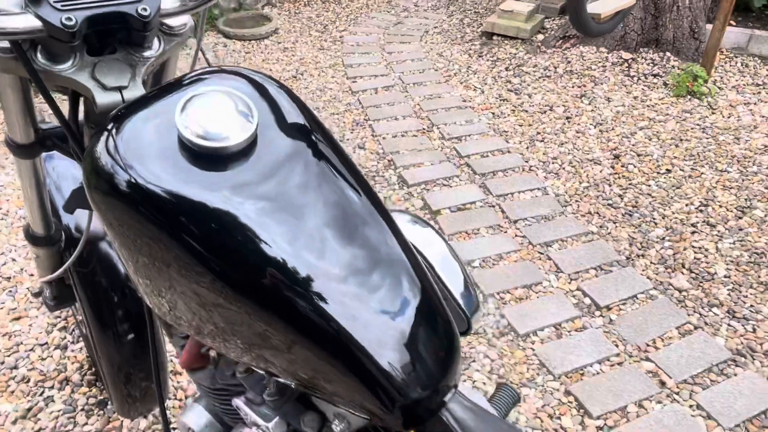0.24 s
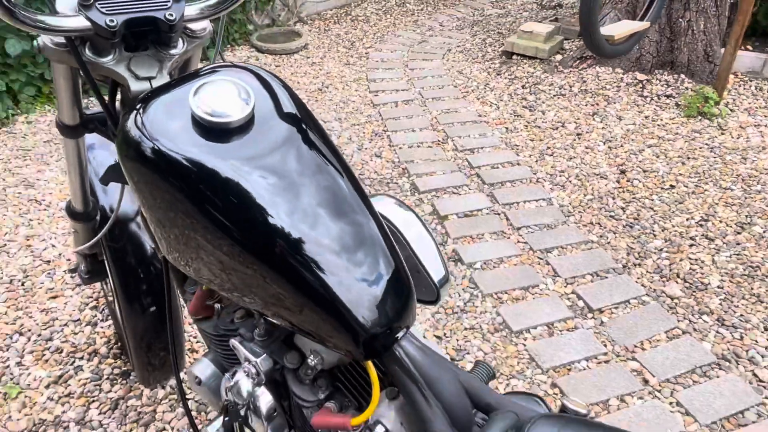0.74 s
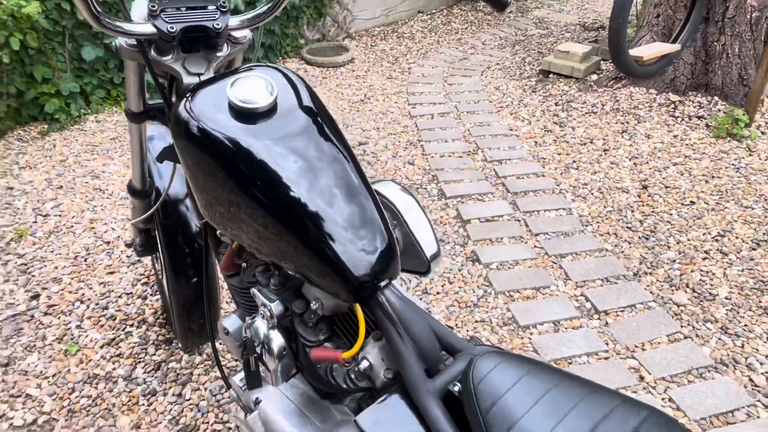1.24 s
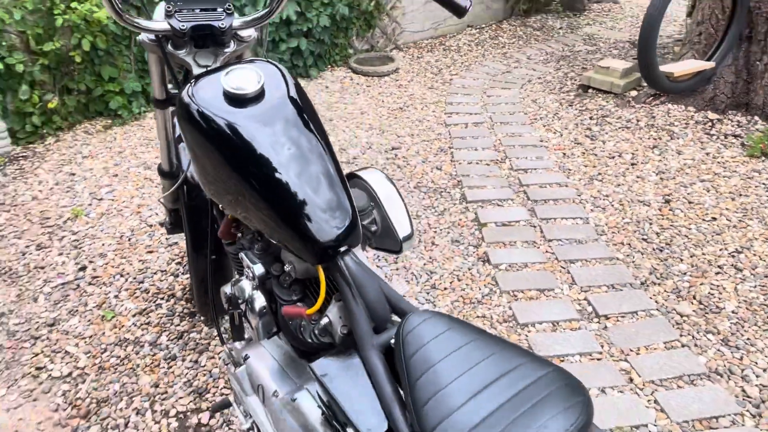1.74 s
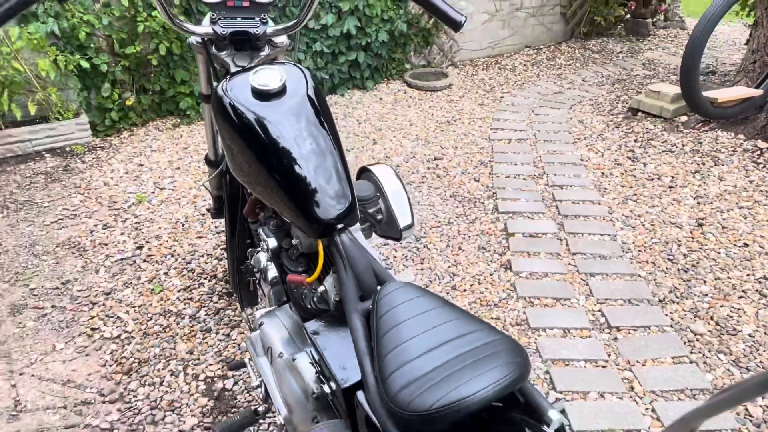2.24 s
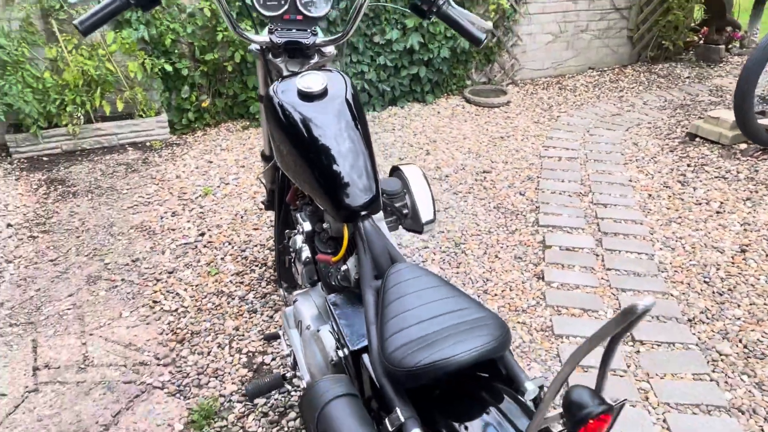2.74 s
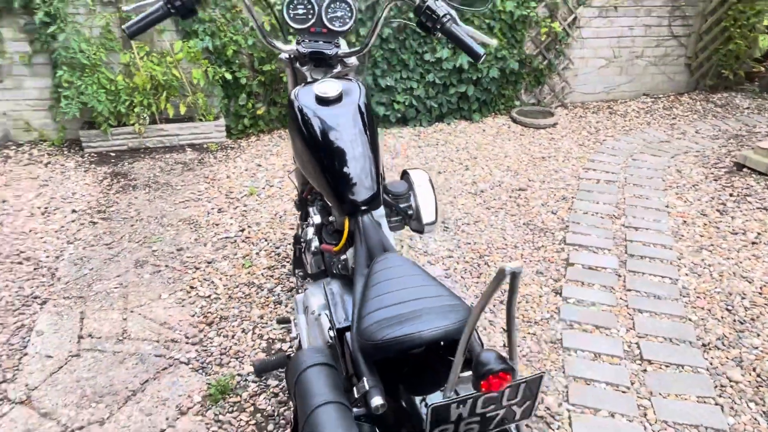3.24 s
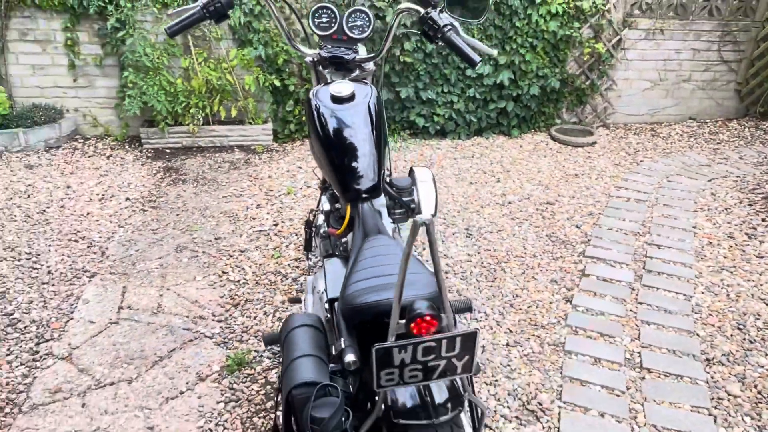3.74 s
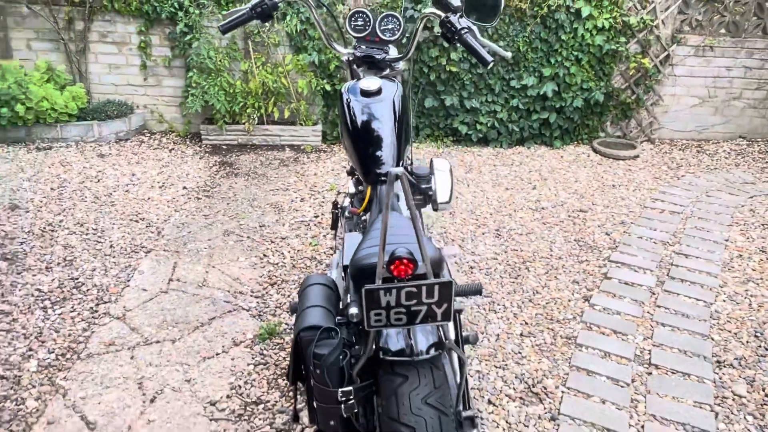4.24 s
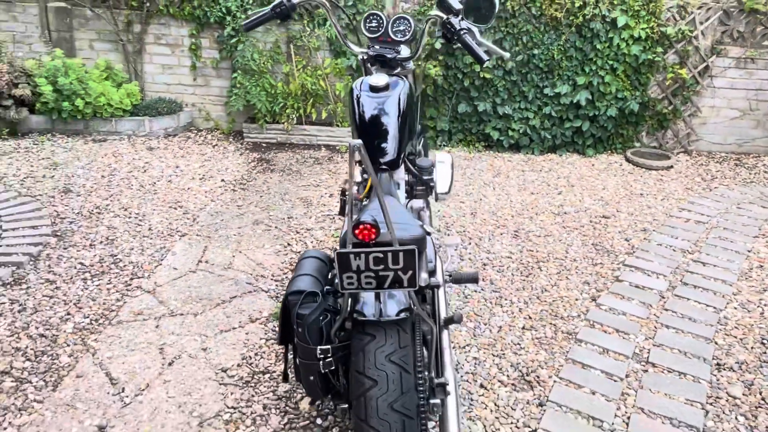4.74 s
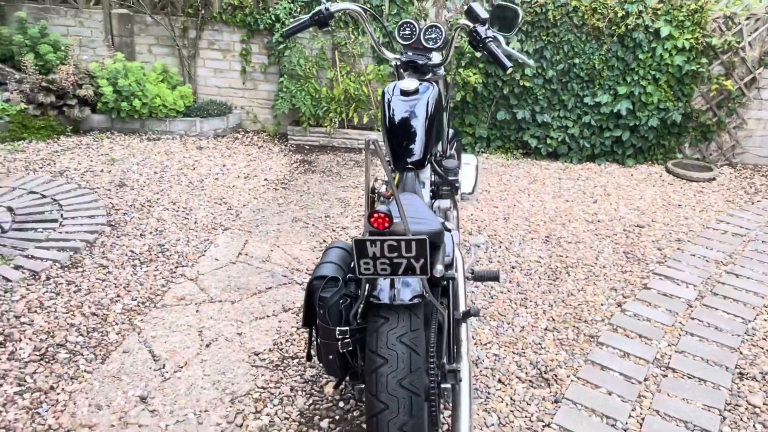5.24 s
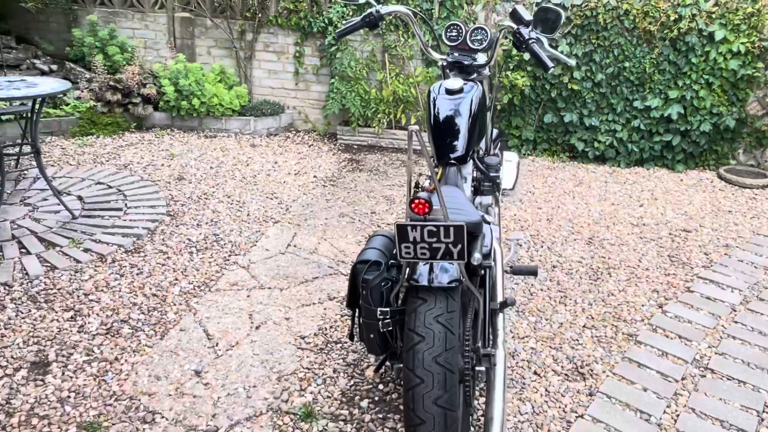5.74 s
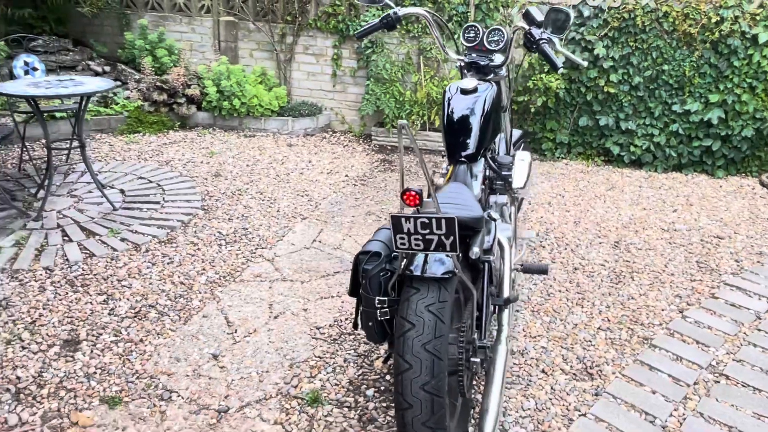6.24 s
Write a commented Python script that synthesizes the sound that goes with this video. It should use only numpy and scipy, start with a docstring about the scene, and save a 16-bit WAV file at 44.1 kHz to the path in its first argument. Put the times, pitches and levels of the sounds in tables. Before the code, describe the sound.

Close stereo pickup of a big two-cylinder motorcycle at a steady but lumpy idle in an open yard. Rapid low thuds alternate strong and weak over a continuous mechanical rattle. Near the engine there are ticks, clanks and dull knocks; from the midpoint the microphone reaches the pipes, and dry cracks, clacks and airy spitting stand out over the thumps. It continues running to the end, without revving.

```python
"""A two-cylinder motorcycle idles unevenly while the listener walks from the tank to the tail pipes.
Each firing is a knock in the engine (filtered noise), a crack at the pipe mouth (resonant noise bursts)
and a low thump (a short pressure swing); some firings are weak or almost silent.
Valve gear and chains clatter underneath as patchy noise, with ringing cases and gear whine.
The gas in the pipes keeps ringing between firings, and a microphone pair hears it all in stereo."""
import sys
import numpy as np
from scipy import signal
from scipy.fft import rfft, irfft
from scipy.io import wavfile
from scipy.ndimage import uniform_filter1d

SR = 44100
rng = np.random.default_rng(int(sys.argv[2]) if len(sys.argv) > 2 else 0)


def to_wav(s):
    """Save 16-bit WAV."""
    ch = np.atleast_2d(s).T  # columns
    pcm = np.round(np.clip(ch, -1, 1) * 32767)  # PCM
    wavfile.write(sys.argv[1], SR, pcm.astype(np.int16))


N = 285768


def gain_of(db):
    """Decibels to gain."""
    return 10 ** (np.asarray(db) / 20)


def evened(x):
    """Scales to rms 1."""
    return x / np.sqrt(np.mean(x ** 2) + 1e-20)


def read(points, hz, axis=1):
    """One column of a table, joined on a log-frequency axis."""
    table = np.transpose(points)
    return np.interp(np.log(hz + 1), np.log(table[0] + 1), table[axis])


def along(when, values):
    """A curve over the whole scene, one value a sample."""
    return np.interp(np.arange(N) / SR, when, values)


def noise(magnitude):
    """Two unrelated noises with the given magnitude spectrum, rms 1."""
    hz = np.fft.rfftfreq(N, 1 / SR)
    return evened(irfft(rfft(rng.standard_normal((2, N))) * magnitude(hz), N))


def ringing(modes):
    """Two unrelated noises held in steep resonances, rms 1; modes are (Hz, width Hz, dB)."""
    return noise(lambda hz: sum(gain_of(db) / (1 + (2 * (hz - f) / width) ** 2) for f, width, db in modes))


def bursts(times, levels_db, rise, fall):
    """Sum of envelopes with a smooth rise to each time and an exponential fall, peak at the level."""
    at = np.round((np.asarray(times) - rise) * SR).astype(int)
    t = np.arange(-rise, 8 * fall, 1 / SR)
    inside, train = (at >= 0) & (at < N), np.zeros(N)
    np.add.at(train, at[inside], gain_of(levels_db)[inside])
    shape = np.where(t < 0, np.cos(t / rise * np.pi / 2) ** 2, np.exp(-np.maximum(t, 0) / fall))
    return signal.oaconvolve(train, shape)[:N]


def pulses(times, sizes):
    """One-sample pulses of the given sizes, with a second to spare at the end."""
    return np.bincount(np.round(SR * times).astype(int), sizes, N + SR)


def dip(t, hz, width):
    """A pressure trough at time 0: a cosine under a bell envelope."""
    return -np.cos(2 * np.pi * hz * t) * np.exp(-(t / width) ** 2 / 2)


def struck(s, hz, level_db, rise, fall):
    """Short tones of random phase, one at each time."""
    t, out = np.arange(0, .05, 1 / SR), np.zeros(N + SR)
    shape = np.where(t < rise, np.sin(t / rise * np.pi / 2) ** 2, np.exp(-(t - rise) / fall))
    for at, f, db, turn in zip(s, hz, level_db, rng.random(len(s))):
        out[round(at * SR):][:len(t)] += gain_of(db) * shape * np.sin(2 * np.pi * (f * t + turn))
    return out[:N]


# one row a firing, the two cylinders alternating: (time of the thump's trough [s], relative burn strength [dB])
FIRING_ORDER = [(0.0177, -5), (0.098, -4.5), (0.1619, -16), (0.232, -13), (0.3045, -4.5), (0.3813, -4),
                (0.442, -10), (0.508, -19), (0.58, -8), (0.6707, -5), (0.73, -3.5), (0.8055, -19),
                (0.87, -12), (0.9502, -5.5), (1.0082, -3.5), (1.08, -5.5), (1.1431, -11), (1.2136, -6),
                (1.277, -6), (1.351, -5), (1.416, -11), (1.4926, -7.5), (1.558, -4.5), (1.6389, -5.5),
                (1.715, -22), (1.773, -8.5), (1.8379, -4.5), (1.9145, -5), (1.982, -11), (2.059, -7.5),
                (2.129, -5), (2.2156, -6), (2.2796, -7.5), (2.3631, -8), (2.429, -4.5), (2.512, -5.5),
                (2.57, -17.5), (2.6554, -11.5), (2.726, -3.5), (2.8032, -4.5), (2.8671, -8.5), (2.936, -13),
                (3.012, -7), (3.1, -5), (3.1565, -5), (3.218, -13), (3.29, -8), (3.3675, -5.5), (3.428, -4),
                (3.508, -7), (3.5707, -8), (3.6561, -5), (3.7153, -4.5), (3.789, -7), (3.854, -8),
                (3.934, -26), (4.0087, -6), (4.103, -4.5), (4.16, -4.5), (4.2278, -8.5), (4.2915, -8.5),
                (4.367, -5.5), (4.4331, -24), (4.5131, -7.5), (4.5757, -4), (4.646, -6), (4.709, -8),
                (4.783, -9.5), (4.849, -31), (4.9313, -7.5), (4.996, -3.5), (5.0683, -6), (5.1284, -8.5),
                (5.196, -15), (5.272, -38), (5.3595, -6), (5.415, -2.5), (5.484, -21), (5.5455, -8),
                (5.6214, -6), (5.6815, -6.5), (5.7599, -7.5), (5.8208, -5), (5.8965, -7.5), (5.962, -9.5),
                (6.041, -9), (6.1061, -4), (6.1867, -6), (6.2536, -10.5), (6.331, -11.5), (6.401, -4),
                (6.4792, -5.5)]


def firings():
    """Time [s], burn strength [dB] and cylinder (0 first, 1 second) of each firing."""
    s, burn_db = np.transpose(FIRING_ORDER)
    return s, burn_db, np.arange(len(s)) % 2


USUAL_DB = -6  # burn strength of a usual firing


def heard(curve, slope):
    """Level of one part of each firing: the walk sets it for a usual firing, the burn strength moves it."""
    s, burn_db, second = firings()
    when, first_db, second_db = np.transpose(curve)
    usual = np.where(second, np.interp(s, when, second_db), np.interp(s, when, first_db))
    return usual + np.array(slope)[second] * (burn_db - USUAL_DB)


def valve_opens():
    """Moment each exhaust valve cracks open, earlier ahead of the thump when the firing is weak."""
    s, burn_db, _ = firings()
    return s - np.clip(.0095 - 0.00067 * (burn_db + 3), .009, .0150)


# noise colour of the moving parts: (frequency [Hz], relative level per Hz [dB])
CLATTER_COLOUR = [(90, -12), (190, -2), (280, -5), (450, -11), (900, -6.5), (1900, -5.5), (2700, -12.5),
                  (3300, -16.5), (5300, -17.5), (7000, -26), (9000, -36), (11000, -30.5), (13000, -49),
                  (15500, -36)]
# walk round the machine: (time [s], relative clatter level [dB], tilt of the clatter [dB per octave])
WALK_LEVELS = [(0.0, -24, -2.5), (0.85, -25, -2.5), (2.04, -27.5, -2.5), (3.2, -27.5, -3),
               (3.7, -27.5, -2.46), (4.06, -28.5, -2.5), (6.48, -29.5, -2.53)]
# gear train whines: (frequency [Hz], width [Hz], relative level [dB])
GEAR_WHINES = [(1183, 9.8, -24), (2494, 27, -22)]


def clatter():
    """Valve gear, chains and intake: dense noise in drifting patches; valves tick by crank angle; gears whine."""
    frames, hz = N // 128 + 5, np.fft.rfftfreq(512, 1 / SR)
    s, level_db, tilt_db = np.transpose(WALK_LEVELS)
    t = np.arange(frames) * 128 / SR
    a, b, c, d, patches, flutter = rng.standard_normal((frames, len(hz), 6)).T
    flutter = evened(uniform_filter1d(uniform_filter1d(flutter, size=40, axis=0), size=8, axis=1))
    patches = evened(uniform_filter1d(uniform_filter1d(patches, size=3, axis=0), size=6, axis=1))

    octaves = np.log2(hz[:, None] / 1200 + 0.004)
    colour_db = read(CLATTER_COLOUR, hz)[:, None] + octaves * np.interp(t, s, tilt_db)
    flutter_share = np.clip(hz[:, None] / 3000, 0, 1)  # only the treble flutters fully
    drift_db = 2.6 * patches + 2.2 * flutter * flutter_share
    z = np.array([a + 1j * b, c + 1j * d]) * gain_of(colour_db + drift_db)
    hiss = evened(signal.istft(z, nperseg=512, noverlap=384)[1][:, :N])

    fired, burn_db, _ = firings()
    draws = rng.random((len(fired) - 1, 4, 2))
    crank = np.array([.12, .35, .62, .8]) + 0.11 * draws[..., 0]  # share of the gap between firings
    ticks = fired[:-1, None] + np.diff(fired)[:, None] * crank
    rattle = 1 + bursts(ticks.ravel(), -8. + 12 * draws[..., 1].ravel(), 0.003, 0.0035)
    rattle += bursts(fired - .022, -7 + 1.2 * (burn_db - USUAL_DB), 0.014, 0.03)  # swells with each burn

    whine = sum(gain_of(db) * ringing([(f, width, 0)]) for f, width, db in GEAR_WHINES)
    whine = whine * (1 + 2 * np.exp(-np.arange(N) / SR / 0.27))  # strongest beside the engine
    return (evened(hiss * rattle) + whine) * gain_of(2.0 + along(s, level_db))


# resonances of the engine cases: (frequency [Hz], width [Hz], relative level [dB])
CASE_RESONANCES = [(647, 27, -3.5), (850, 110, -5), (1075, 42, -9), (1460, 100, -23), (1980, 84, 7),
                   (4730, 120, -15)]


def clanks():
    """Metallic clanks of the cases at scattered moments about 26 to 50 ms ahead of each thump, uneven by mode."""
    s, level_db = np.transpose(WALK_LEVELS)[:2]
    fired, burn_db, _ = firings()
    blows, out = rng.random((len(CASE_RESONANCES), len(fired), 3)), 0
    for (hz, width, db), rows in zip(CASE_RESONANCES, blows):
        at = fired - np.where(rows[:, 2] < .6, .034, .05) + .008 * rows[:, 0]
        blow_db = db + .3 * burn_db - 3.0 - 14.0 * rows[:, 1]
        out += ringing([(hz, width, 0)]) * bursts(at, blow_db, 0.002, 0.01)
    return out * gain_of(along(s, level_db))


# noise colour of the knock: (frequency [Hz], relative level per Hz [dB])
KNOCK_COLOUR = [(300, -23), (800, 26), (1900, 23.5), (2600, 30.5), (3500, 1), (5000, 15), (7000, -35),
                (15500, -109)]
# knock of a usual firing along the walk: (time [s], first cylinder [relative dB], second [relative dB])
KNOCK_WALK = [(0, -11, -9.5), (0.8, -9.5, -7.5), (2.0, -25, -22.5), (3.0, -16.5, -18), (3.6, -15, -10.5),
              (4.2, -26, -21), (4.6, -20, -28), (5.2, -7.5, -7), (5.7, -16, -13), (6.48, -25, -27)]
KNOCK_SLOPE = (0.099, 3.7)  # dB per dB of burn strength: first, second cylinder


def knocks():
    """Combustion rings the engine cases a little before the exhaust opens: a sharp tick and a duller ring."""
    s, _, second = firings()
    knock_db = heard(KNOCK_WALK, KNOCK_SLOPE)
    at = s - np.where(second, .0360, .0355)
    ring = noise(lambda hz: gain_of(read(KNOCK_COLOUR, hz))) * bursts(at, knock_db - 21.5, 0.0026, 0.011)
    tick = ringing([(4720, 3300, 0)]) * bursts(at, knock_db - 22.0, 0.0013, 0.011)
    return ring + tick


# loudest knocks in the engine cases: (time [s], relative level [dB], ring [Hz], relative tick level [dB])
CASE_BLOWS = [(0.064, -6, 817, -21), (0.265, -20, 1090, -29), (0.348, -12, 940, -28),
              (0.633, -10.5, 775, -23), (0.695, -6, 1850, -24), (0.91, -6.5, 902, -22),
              (0.974, -38, 1060, -34), (1.242, -13, 1680, -34), (1.521, -10.5, 884, -47.5),
              (1.602, -13, 840, -24.5), (1.8, -8.5, 1120, -41), (2.475, -15, 1120, -27),
              (2.687, -7.5, 1095, -42), (2.769, -12, 1430, -24.5), (3.062, -14, 1420, -30),
              (3.124, -7, 1176, -36)]


def hard_knocks():
    """The loudest knocks in the engine cases: a sudden coarse burst, a short ring and a tick."""
    s, peak_db, hz, tick_db = np.transpose(CASE_BLOWS)
    coarse = noise(lambda f: gain_of(read(KNOCK_COLOUR, f)) / (1 + (f / 2800) ** 6))
    burst = coarse * bursts(s + 0.00099, peak_db - 15.0, 0.0022, 0.0049)
    ring = struck(s, hz, peak_db - 14.5, 0.0011, 0.01)
    tick = ringing([(5100, 2700, 0)]) * bursts(s + 0.00042, tick_db - 7.0, 0.001, 0.014)
    return burst + ring + tick


# standing waves in the pipes: (frequency [Hz], width [Hz], relative level [dB])
STANDING_WAVES = [(55, 40, -44), (119, 18, -39)]
# combustion thud: lead on the thump [s], level relative to the burn [dB] for first and second cylinder
THUD_EARLY_S, THUD_DB = 0.0285, (-21, -22.5)


def pipes():
    """The gas columns keep ringing; each firing adds a low combustion thud, then a puff of turbulence."""
    s, burn_db, second = firings()
    swell = 2.74 + bursts(s + 0.0098, 1.9 * burn_db, 0.049, 0.064)
    ring = sum(gain_of(db) * ringing([(hz, width, 0)])[0] for hz, width, db in STANDING_WAVES) * swell
    puff = bursts(s - .006, burn_db - 30.5, 0.013, 0.0018)
    thud = bursts(s - THUD_EARLY_S, burn_db + np.array(THUD_DB)[second], 0.004, 0.018)
    return ring + ringing([(255, 60, 0)])[0] * (puff + thud)


# slow heave of gas, first and second pipe:
# (trough after the thump [s], frequency [Hz], bell width [s], level at 0 dB burn strength [dB])
GAS_HEAVES = [(-.0005, 67, 0.01, -24.5), (.0125, 78.5, 0.012, -17)]
# return stroke: delay after the thump [s], pitch [Hz], middle level [dB]
STROKE_S, STROKE_HZ, STROKE_DB = 0.0443, 71.5, -20.5


def heaves():
    """Low swings of gas: one with each thump, one pumped by the return stroke, burn or no burn."""
    (s, burn_db, _), t, out = firings(), np.arange(-1500, 1501) / SR, 0
    for k, (late, hz, width, db) in enumerate(GAS_HEAVES):
        train = pulses(s[k::2] + late, gain_of(0.46 * burn_db[k::2] + db))
        out += signal.oaconvolve(train, dip(t, hz, width), "same")[:N]
    draws = rng.random((len(s), 2)) - .5
    train = pulses(s + STROKE_S + 0.0095 * draws[:, 0], gain_of(STROKE_DB + 8.1 * draws[:, 1]))
    return out + signal.oaconvolve(train, dip(t, STROKE_HZ, 0.0062), "same")[:N]


POP_HZ, POP_S = 300, 0.0022  # pitch, bell width
POP_OPEN_DB, POP_TROUGH_DB = (-19, -24), (-23, -30)  # relative to the burn: first, second cylinder


def pops():
    """Short pressure dips that sharpen the start and the trough of each firing."""
    (s, burn_db, second), t = firings(), np.arange(-200, 201) / SR
    open_db = burn_db + np.array(POP_OPEN_DB)[second]
    trough_db = burn_db + np.array(POP_TROUGH_DB)[second]
    train = pulses(np.concatenate([valve_opens() - .002, s]), gain_of(np.concatenate([open_db, trough_db])))
    return signal.oaconvolve(train, dip(t, POP_HZ, POP_S), "same")[:N]


# loudest cracks, ringing the pipe mouth: (time [s], relative level [dB], low pitch [Hz], high pitch [Hz])
MOUTH_CLACKS = [(1.546, -19, 1310, 2000), (1.827, -16, 1420, 2300), (2.4174, -20, 1350, 2350),
                (3.2741, -16, 1620, 2470), (3.4155, -14, 1280, 3320), (3.7035, -14, 2180, 2560),
                (3.9952, -13.5, 1736, 2730), (4.1465, -9, 1480, 2870), (4.2747, -14.5, 1640, 2890),
                (4.5637, -5, 1740, 2880), (4.6944, -12, 1296, 2900), (4.9842, -9, 1260, 2690),
                (5.1114, -14, 1560, 2470), (5.403, -8, 1630, 2920), (5.53, -27, 1960, 2800),
                (5.6695, -20, 1600, 2690), (5.8085, -19, 1780, 2730), (5.9464, -16.5, 1650, 2880),
                (6.0935, -9.5, 1590, 2820), (6.2354, -18, 1640, 3100), (6.3866, -14, 1410, 3280)]


def clacks():
    """The pipe mouth swells into a ring at two pitches and their relatives; the higher one then chatters."""
    s, peak_db, low_hz, high_hz = np.transpose(MOUTH_CLACKS)
    partials = ((low_hz, -8.0), (high_hz, -8.0), (.93 * high_hz, -11.0),
                (0.599 * low_hz, -14.0), (1.7 * high_hz, -19.0))
    out = 0
    for hz, db in partials:
        out += struck(s - .0025, hz, peak_db + db, .0045, .0026)
    for late in (.018, .023, .04):
        out += struck(s + late, high_hz, peak_db - 23.0, .002, .0025)
    return out


# hiss of the gas jet: (frequency [Hz], relative level per Hz [dB])
JET_HISS = [(6500, -16), (7500, 3), (9000, 1.5), (11000, 1), (13000, -3), (15500, -3.5)]


def jet_hiss():
    """Broad turbulence of the escaping gas, cut steeply below 6.5 kHz."""
    return noise(lambda hz: gain_of(read(JET_HISS, hz)) * np.minimum(hz / 6500, 1) ** 8)


# rasp of the first pipe along the walk: (time [s], relative level [dB])
RASP_WALK = [(3.0, -24), (3.4, -18), (3.9, -18.5), (4.3, -10.5), (5.2, -12.5), (5.6, -14.5), (6.48, -21)]
RASP_LATE_S, HALF_BURN_DB, RASP_TREBLE_DB = 0.011, -9, -3  # loudest after a half burn
RASP_FADE_STRONG, RASP_FADE_WEAK, RASP_DULL_STRONG = 1.6, 0.26, 7  # dB per dB away from a half burn


def rasps():
    """Late turbulence rasps in the first pipe; stronger burns dull it, stronger and weaker ones fade it."""
    s, burn_db, _ = firings()
    strong = np.maximum(burn_db[::2] - HALF_BURN_DB, 0)
    weak = np.maximum(HALF_BURN_DB - burn_db[::2], 0)
    at = s[::2] + RASP_LATE_S
    level_db = np.interp(at, *np.transpose(RASP_WALK)) - RASP_FADE_STRONG * strong - RASP_FADE_WEAK * weak
    treble_db = level_db + RASP_TREBLE_DB - RASP_DULL_STRONG * strong
    body = ringing([(2690, 560, 0), (1500, 700, -7.0)])
    treble = ringing(JET_WHISTLE) + gain_of(-7.5) * jet_hiss()
    out = 0
    for shift in (-.007, .001, .009):  # three overlapping puffs
        out += body * bursts(at + shift, level_db - 9.5, 0.006, 0.0026)
        out += treble * bursts(at + shift, treble_db - 19.0, 0.011, 0.0043)
    return out


# pipe mouth resonances: (frequency [Hz], width [Hz], relative level [dB])
MOUTH_RESONANCES = [(1110, 160, -17), (1640, 580, -8.5), (1870, 1100, -9.5), (2770, 750, -12.5)]
# whistle of the gas jet: (frequency [Hz], width [Hz], relative level [dB])
JET_WHISTLE = [(3790, 910, 0.5), (5305, 1070, 7), (6550, 460, -4)]
# crack of a usual firing along the walk: (time [s], first cylinder [relative dB], second [relative dB])
CRACK_WALK = [(0, -25, -38.5), (0.7, -36, -38), (1.3, -36, -43), (2.0, -33, -37), (2.8, -21.5, -20),
              (3.2, -13.5, -24.5), (4.1, -17.5, -21.5), (5.1, -12.5, -19.5), (6.48, -9.5, -22.5)]
# jet of a usual firing along the walk: (time [s], first cylinder [relative dB], second [relative dB])
JET_WALK = [(0, -33.5, -30), (0.7, -33.5, -38), (1.3, -27, -36), (2.0, -28, -36), (2.8, -32, -34.5),
            (3.4, -22.5, -32), (4.5, -24, -29.5), (5.4, -24, -23), (6.48, -19, -26.5)]
CRACK_SLOPE, JET_SLOPE = (0.33, 2.7), (1.5, 2.3)  # dB per dB of burn strength: first, second cylinder


def cracks():
    """Turbulent gas bursts from the pipe mouth ahead of the thump: mouth ring, whistle and hiss, with tails."""
    at, crack_db, jet_db = valve_opens(), heard(CRACK_WALK, CRACK_SLOPE), heard(JET_WALK, JET_SLOPE)
    # slight random level change of each resonance
    colour_db = 0.36 * rng.standard_normal((len(at), len(MOUTH_RESONANCES)))
    out = 0
    for (hz, width, db), own_db in zip(MOUTH_RESONANCES, colour_db.T):
        level_db = crack_db + db + own_db
        shape = bursts(at, level_db, 0.006, 0.0032) + bursts(at + 0.025, level_db - 17.5, 0.015, 0.012)
        out += ringing([(hz, width, 0)]) * shape

    tint_db = 3.5 * rng.standard_normal((len(at), len(JET_WHISTLE), 2))  # whistle and tail change colour
    for k, (hz, width, db) in enumerate(JET_WHISTLE):
        head, tail = jet_db + db - 10.5 + tint_db[:, k].T
        shape = bursts(at, head, 0.007, 0.0048) + bursts(at + 0.02, tail - 19.0, 0.012, 0.056)
        out += ringing([(hz, width, 0)]) * shape

    air_db = -29.5 + 1.12 * (jet_db + 23.0)  # the hiss grows faster than the whistle
    shape = bursts(at - .001, air_db, 0.0046, 0.0048) + bursts(at + 0.022, air_db - 22.0, 0.014, 0.026)
    return out + jet_hiss() * shape


# thump of each cylinder's pipe:
# (frequency [Hz], rise width [s], fall width [s], envelope top of a strong thump after its trough [s])
PIPE_THUMPS = [(128, .0021, .0040, .0011), (156, .0032, .0046, .0010)]
WEAK_TOP_S = (-.0004, .0006)  # envelope top of a weak thump, each pipe
RETURN_S, RETURN_DB = (0.0123, 0.01625), (-26, -15)  # wave coming back along each pipe, relative to the burn


def thumps():
    """A short pressure swing from each pipe, its return wave, a second puff and scattered smaller swings."""
    s, burn_db, second = firings()
    t, out, count = np.arange(-1000, 2000) / SR, np.zeros(N), 8
    draws = rng.random((len(s), count, 2))

    # gas is pumped even by a feeble firing: small swings of either sign spread through the gap
    share = (np.roll(np.arange(count), 2) + draws[..., 0]) / (count - 2)
    late = .016 + (np.diff(s, append=s[-1] + .07)[:, None] - .028) * share
    size = gain_of(-26.5 + 0.2 * burn_db[:, None]) * (2 * draws[..., 1] - 1)

    # the first three swings are the thump, the second puff and the return wave
    late[:, 0], size[:, 0] = 0, gain_of(burn_db)
    late[:, 1] = np.where(burn_db > -7.5, .033, .027) + 0.0035 * (draws[:, 1, 0] - .5)
    size[:, 1] = gain_of(-13 + .25 * burn_db - 4 * draws[:, 1, 1])
    late[:, 2], size[:, 2] = np.array(RETURN_S)[second], gain_of(burn_db + np.array(RETURN_DB)[second])

    strong = np.ones(size.shape)
    strong[:, 0] = np.clip((burn_db + 10) / 4, 0, 1)  # weak thumps blend into the weak shape
    for k, (hz, rise, fall, strong_top) in enumerate(PIPE_THUMPS):
        times = (s[:, None] + late)[k::2].ravel()
        for top, part in ((strong_top, strong), (WEAK_TOP_S[k], 1 - strong)):
            envelope = np.exp(-((t - top) / np.where(t < top, rise, fall)) ** 2 / 2)
            swing = -np.cos(2 * np.pi * hz * t) * envelope
            train = pulses(times, (size * part)[k::2].ravel())
            out += signal.oaconvolve(train, swing)[1000:N + 1000]
    return gain_of(0.5) * out


# microphone pair: (frequency [Hz], likeness for the pipes [0-1], likeness for the engine [0-1],
# right over left [dB])
PORT_LIKENESS = [(97, 1, 0.81, 3), (292, 0.98, 0.93, 1.5), (620, 0.92, 0.73, 2.5), (2200, 0.87, 0.48, 3),
                 (2970, 0.49, 0.028, 2), (4200, 0.11, 0.28, 3), (5370, 0.89, 0.057, 0),
                 (7260, 0.064, 0.029, -4), (7570, 0.83, 1, 3.5), (8900, 0.99, 1, -2.5), (10000, 0.92, 1, 1),
                 (13500, 0.93, 0.83, 0), (14500, 1, .97, -2), (16500, 0.81, 0.89, 6)]
# stereo phase by frequency: (frequency [Hz], right channel relative to left [rad])
STEREO_PHASE = [(800, 0), (2000, .5), (3500, .2), (5500, -1.6), (7500, -3.1), (8900, -3.), (10400, -.25),
                (12600, .25), (13700, 3.), (16000, 3.2)]


def ports(pair, axis):
    """Left hears the first signal; right a blend with the second, turned in phase; levels differ by pitch."""
    hz, (a, b) = np.fft.rfftfreq(N, 1 / SR), rfft(pair)
    same = np.clip(read(PORT_LIKENESS, hz, axis), 0, 1)
    tilt = gain_of(read(PORT_LIKENESS, hz, axis=3) / 2)  # half the level difference on each side
    right = same * a * np.exp(1j * read(STEREO_PHASE, hz)) + np.sqrt(1 - same ** 2) * b
    return irfft(np.array([a / tilt, right * tilt]), N)


def scene():
    """Pipes and engine reach the microphone pair with their own likeness."""
    engine = clatter() + clanks() + knocks() + hard_knocks()
    mouth = pipes() + heaves() + pops() + clacks() + rasps() + cracks() + thumps()
    return ports(engine, axis=2) + ports(mouth, axis=1)


EDGE_HZ = 15850  # upper band limit


def record(dry):
    """The microphone drops the deepest bass, the highest peaks round off; then the band limit."""
    thin = signal.sosfiltfilt(signal.butter(3, 38., "highpass", fs=SR, output="sos"), dry)
    over = np.maximum(abs(thin) - .7, 0)
    soft = thin - np.sign(thin) * (over - .27 * np.tanh(over / .27))
    lowpass = signal.firwin(511, EDGE_HZ, window=("kaiser", 9), fs=SR)
    return signal.oaconvolve(soft, lowpass[None], "same")


dry = scene()
out = record(dry)
to_wav(out)
```